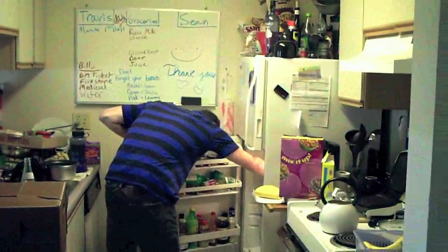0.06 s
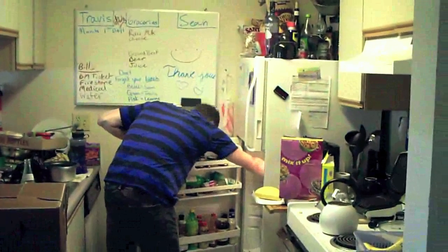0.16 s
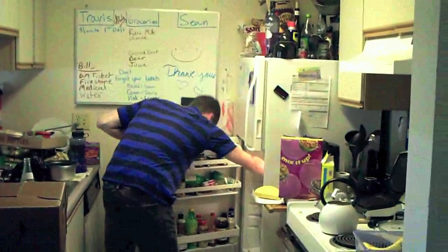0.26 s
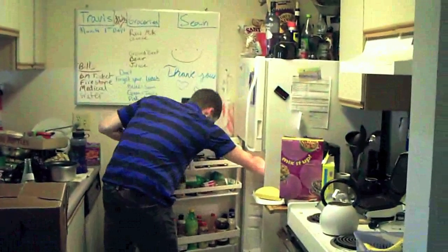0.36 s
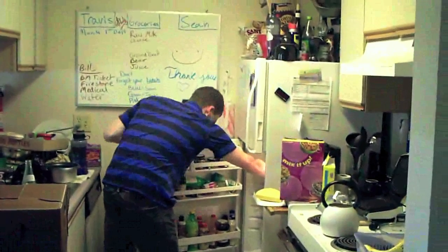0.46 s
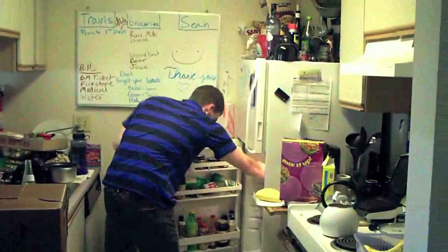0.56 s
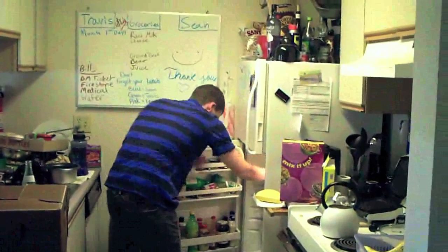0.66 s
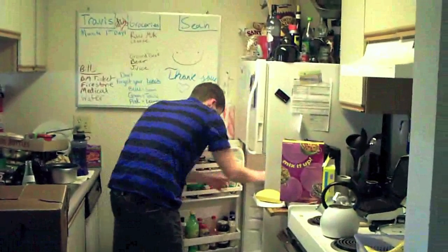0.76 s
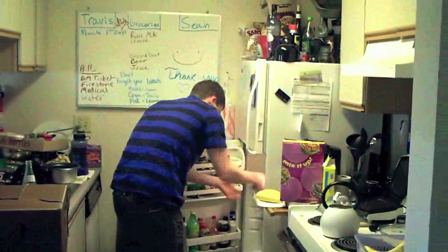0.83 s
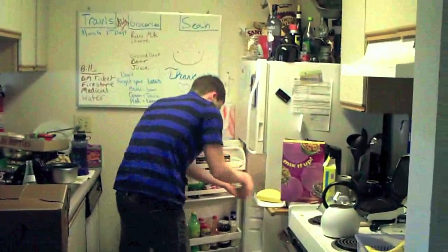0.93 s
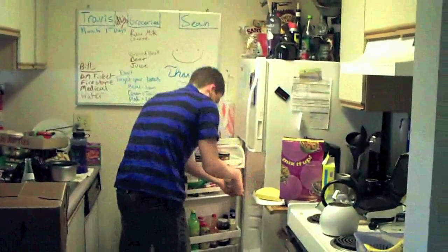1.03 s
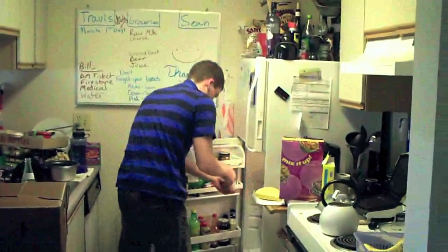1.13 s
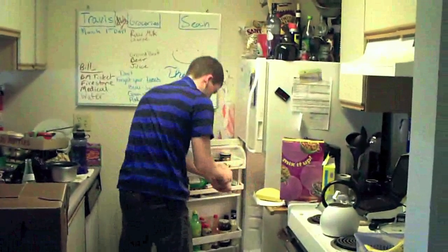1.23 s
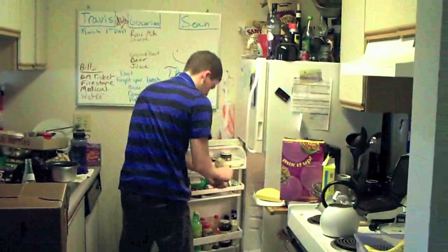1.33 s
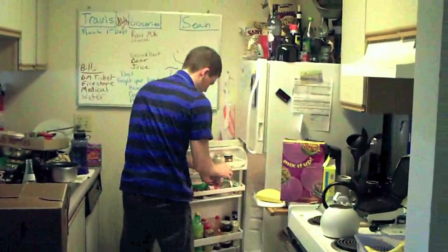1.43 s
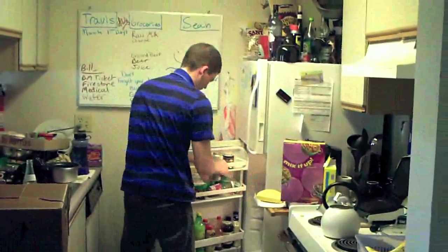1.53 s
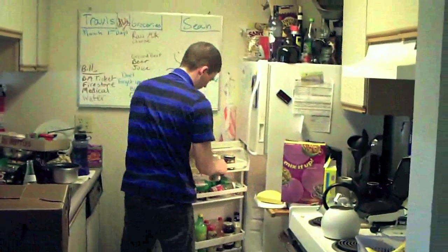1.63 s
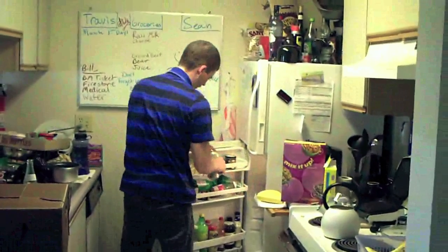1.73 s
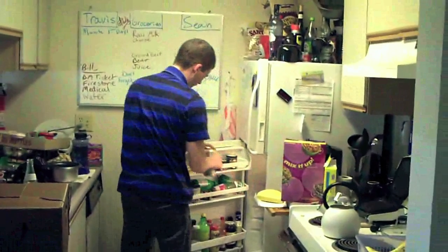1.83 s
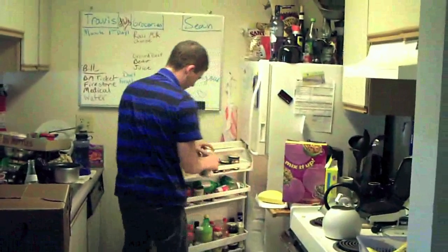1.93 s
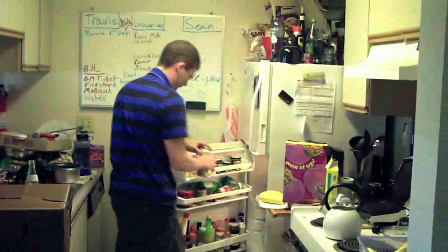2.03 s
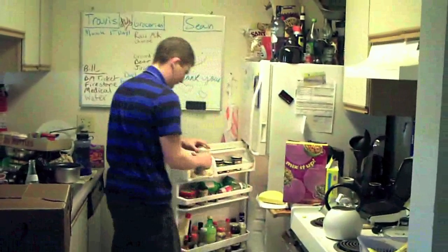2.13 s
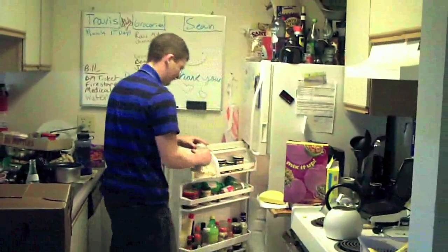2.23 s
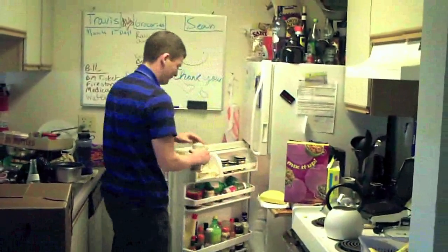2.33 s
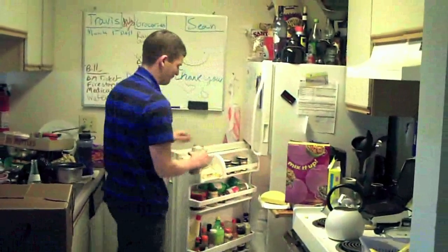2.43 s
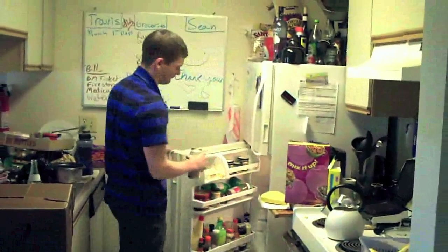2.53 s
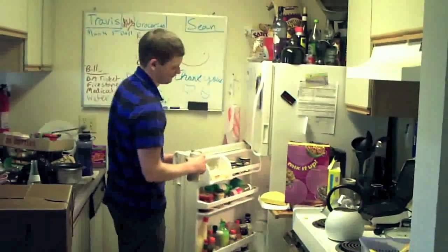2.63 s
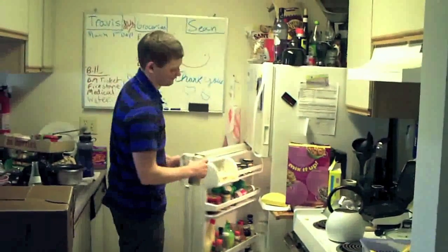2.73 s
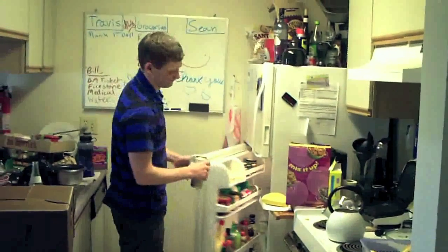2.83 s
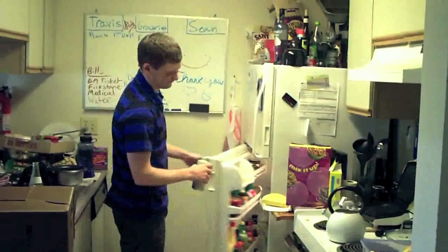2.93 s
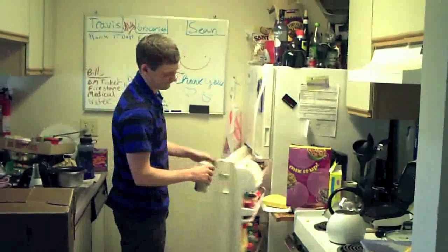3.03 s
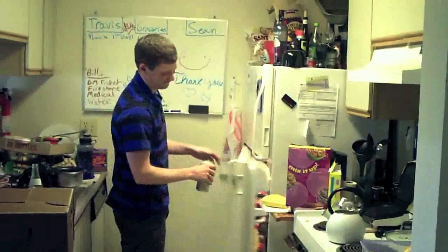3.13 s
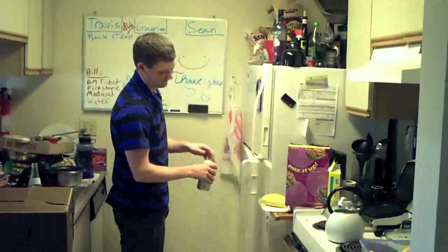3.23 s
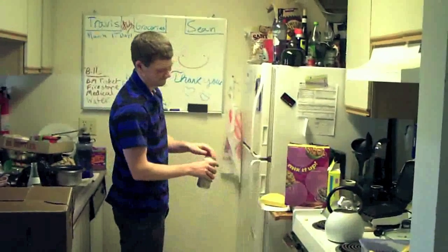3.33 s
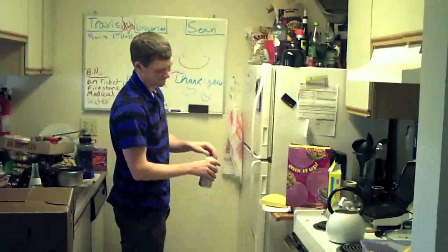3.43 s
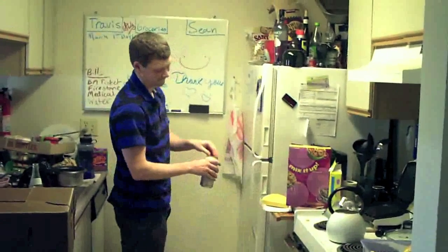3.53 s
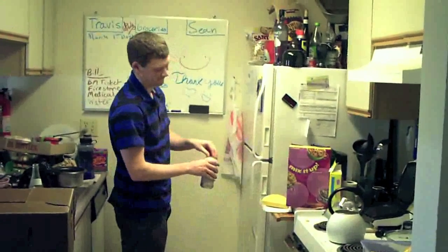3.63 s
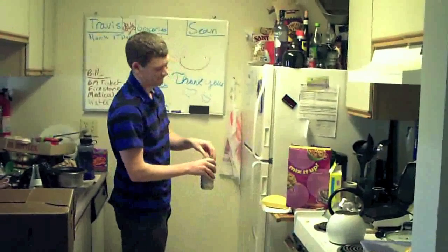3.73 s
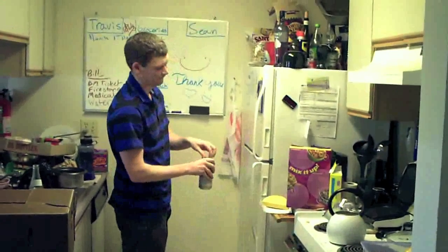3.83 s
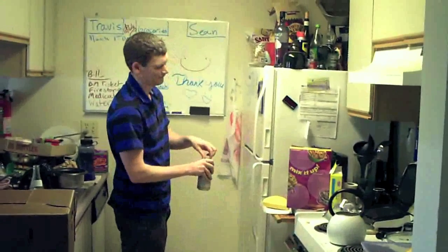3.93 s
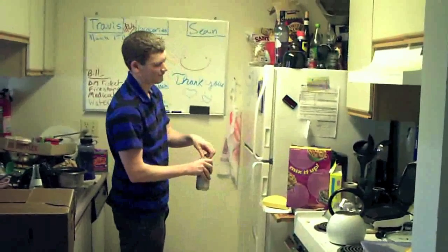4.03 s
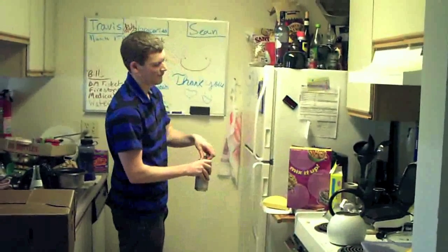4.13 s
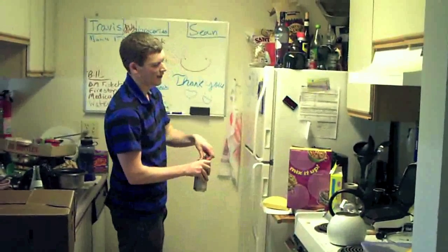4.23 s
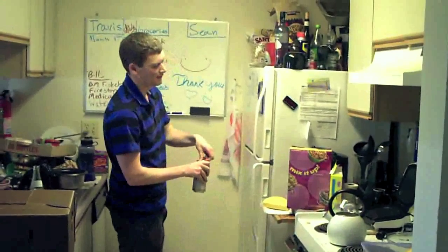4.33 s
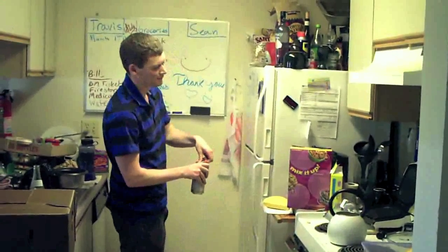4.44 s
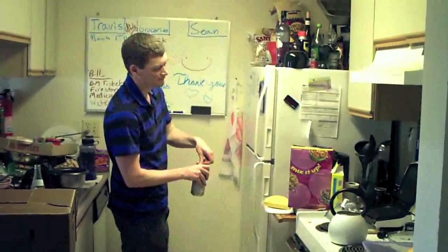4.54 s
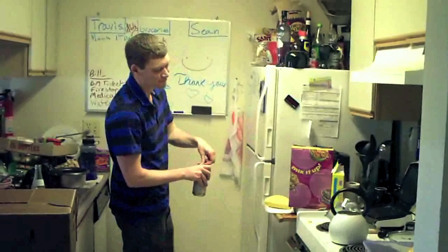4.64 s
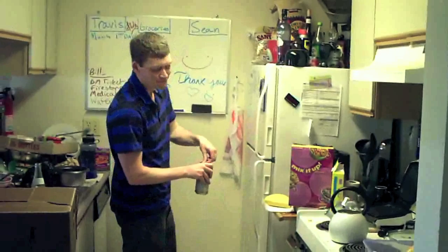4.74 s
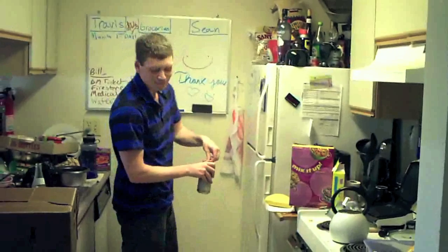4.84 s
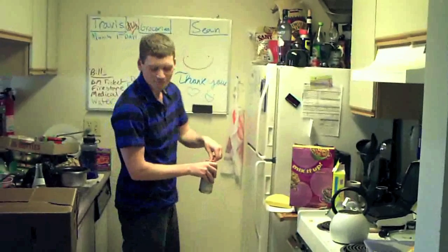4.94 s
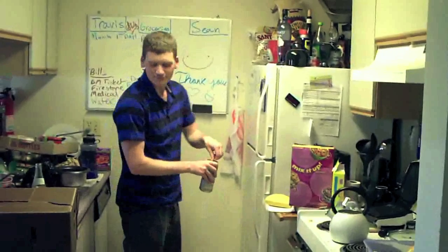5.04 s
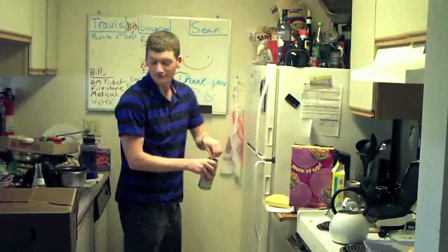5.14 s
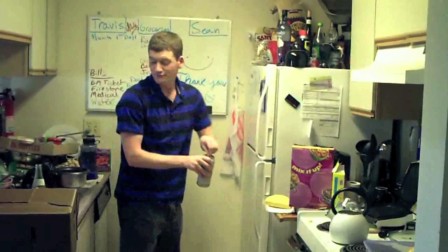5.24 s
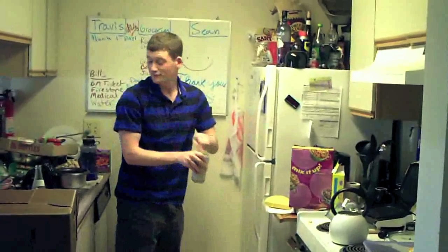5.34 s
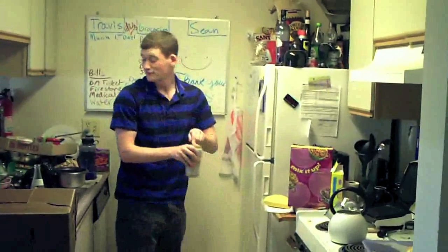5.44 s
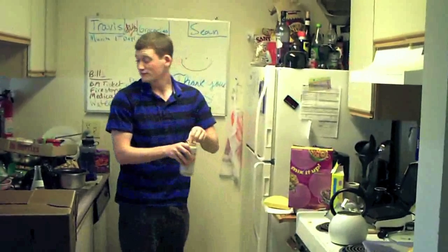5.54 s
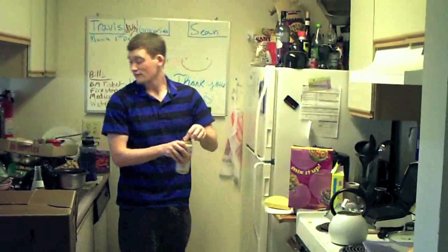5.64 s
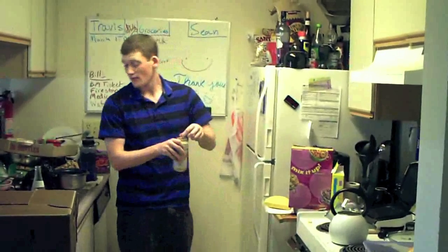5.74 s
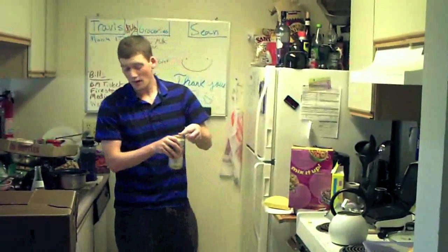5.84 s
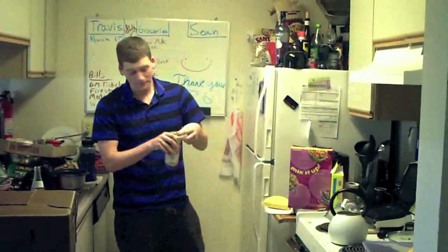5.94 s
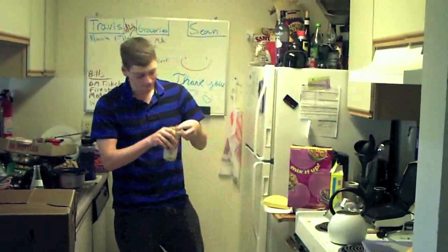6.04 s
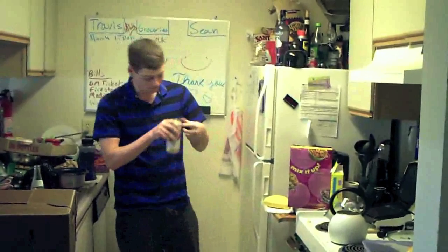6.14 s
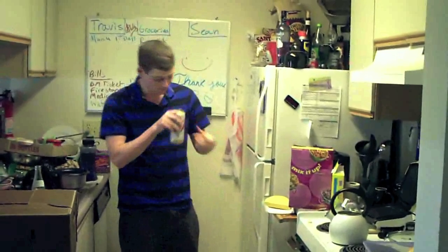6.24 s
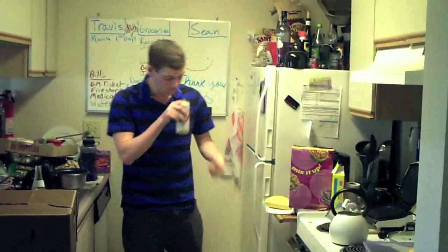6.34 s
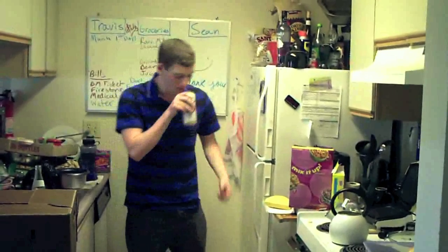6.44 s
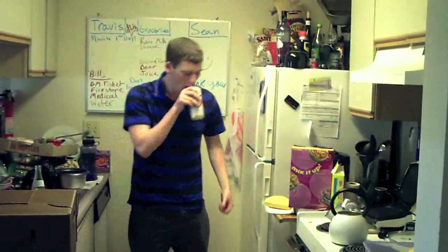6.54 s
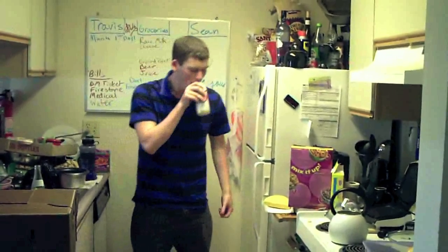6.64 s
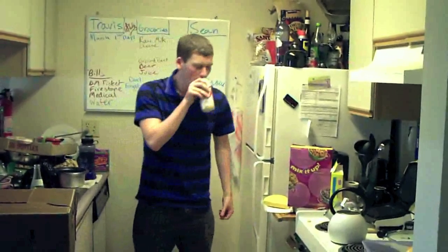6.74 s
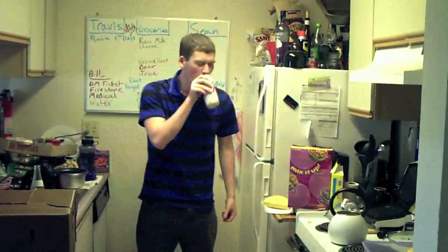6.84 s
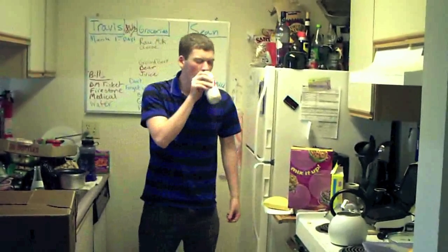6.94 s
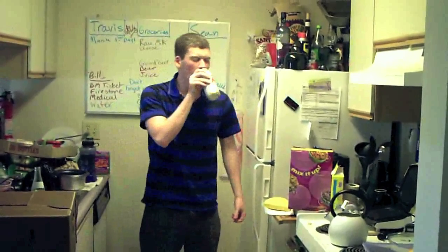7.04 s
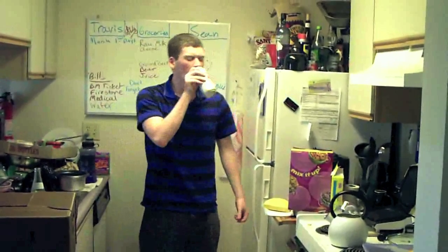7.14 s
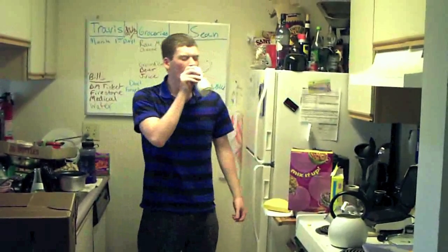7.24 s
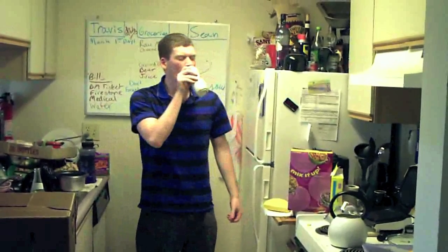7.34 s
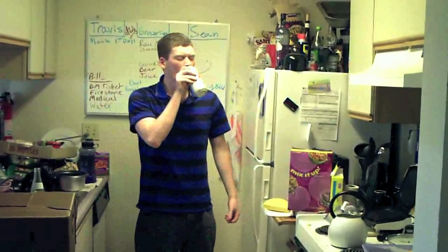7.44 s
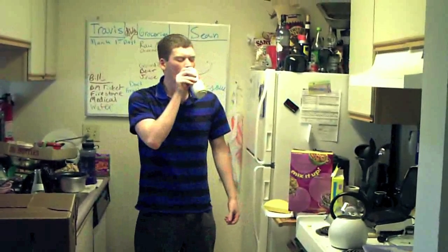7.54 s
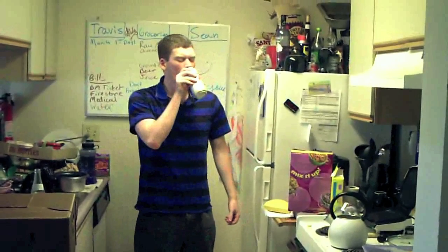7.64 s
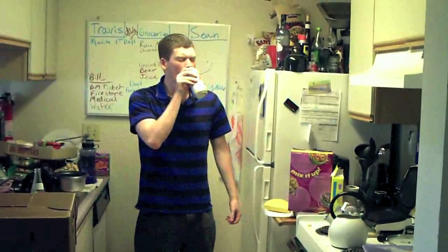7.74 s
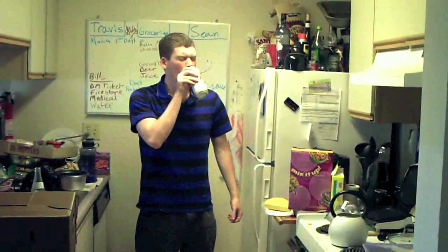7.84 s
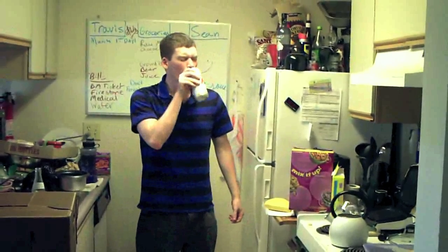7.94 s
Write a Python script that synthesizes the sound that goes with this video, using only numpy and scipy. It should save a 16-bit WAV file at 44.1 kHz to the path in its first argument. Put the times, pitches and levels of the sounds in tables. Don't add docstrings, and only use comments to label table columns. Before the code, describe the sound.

Close, small kitchen with a faint refrigerator hum and thin whine. Full jars and cans knock dully, then tick and rap sharply as one is taken. The door thumps shut with a rattle. A can tab snaps and chatters, gas hisses, and the lid cracks loudly, overloading a narrow, ringing microphone. A few light raps follow.

```python
import sys
import numpy as np
from scipy import signal
from scipy.fft import rfft, irfft
from scipy.io import wavfile
from scipy.ndimage import uniform_filter1d

SR = 44100
rng = np.random.default_rng(int(sys.argv[2]) if len(sys.argv) > 2 else 0)


def decibels_to_gain(level_db):
    exponent = np.asarray(level_db, float) / 20
    return 10 ** exponent


def to_wav(sig):
    pcm = np.clip(np.atleast_2d(sig), -1, 1) * 32767
    pcm = np.round(pcm).astype(np.int16)
    wavfile.write(sys.argv[1], SR, pcm.T)


N = 351918
T = np.arange(N) / SR
MIC_LIFT_DB = 11.5

# f/Hz, width/Hz
BANDS = [(270, 244), (850, 750), (2100, 1140), (5000, 3820)]


def unit(x):
    return x / np.sqrt(np.mean(x ** 2))


def band(x, hz, width):
    low = np.sqrt(hz ** 2 + width ** 2 / 4) - width / 2
    sos = signal.butter(2, [low, low + width], "bandpass", fs=SR, output="sos")
    return signal.sosfilt(sos, x)


def noise(hz, width):
    return unit(band(rng.standard_normal(N), hz, width))


def colour(x, table, size=4096):
    hz, db = np.transpose(table)
    bins_hz = np.fft.rfftfreq(size, 1 / SR) + 1
    cepstrum = irfft(np.log(decibels_to_gain(np.interp(np.log(bins_hz), np.log(hz), db))))
    cepstrum[1:size // 2] *= 2
    cepstrum[size // 2 + 1:] = 0
    return signal.fftconvolve(x, irfft(np.exp(rfft(cepstrum))))[:N]


def walk(rate):
    hold = max(int(SR / rate), 33)
    steps = rng.standard_normal(N // 32)[:N // hold + 1]
    return uniform_filter1d(uniform_filter1d(np.repeat(steps, hold), hold), hold)[:N]


def curves(table, silent=None):
    s, *columns = np.transpose(table)
    return [np.interp(T, s, column, silent, silent) for column in columns]


def decay(s, t60, rise_s):
    i = int(s * SR)
    t = T[:min(int(t60 * SR), N - i)]
    return i, t, (1 - np.exp(-t / rise_s)) * decibels_to_gain(-60 * t / t60)


def swells(table, size=64):
    t = T[::size]
    total = 0
    for s, db, rise_s, fade_s in table:
        total = total + decibels_to_gain(db) * np.exp(np.where(t < s, (t - s) / rise_s, (s - t) / fade_s))
    return np.interp(T, t, total)


def impacts(table, bands, grain_db, rise_s, first_db, clank_db, hard):
    push, first = np.zeros((2, 4, N))
    for s, tick_db, body_db, thud_db, t60 in table:
        between_db = hard * tick_db + (1 - hard) * body_db + clank_db
        levels = (thud_db + 3.5, body_db + 5.0, between_db, tick_db - MIC_LIFT_DB)
        for k, db in enumerate(levels):
            slow = (bands[3][0] / bands[k][0]) ** 0.41
            i, t, env = decay(s, max(t60, .005) * slow, rise_s * slow ** 2.0)
            push[k, i:i + len(t)] += decibels_to_gain(db) * env
            first[k, i] += decibels_to_gain(db + first_db)
    contacts = rng.standard_normal(N) * decibels_to_gain(grain_db * walk(700))
    out = np.zeros(N)
    for k, (hz, width) in enumerate(bands):
        out += band(contacts * push[k] + first[k], hz, width) * np.sqrt(SR / 2 / width)
    return out


def modes(table, rise_s, shake_s):
    out, shake = np.zeros(N), shake_s * walk(350)
    for s, hz, db, t60, *sign in table:
        i, t, env = decay(s, t60, rise_s)
        swing = np.sin(2 * np.pi * hz * (t + shake[i:i + len(t)]))
        out[i:i + len(t)] += (sign[0] if sign else 1) * decibels_to_gain(db) * env * swing
    return out


def jars_and_cans():
    # t/s, tick peak level/dB, body level/dB, thud level/dB, rattle t60/s
    full_knocks = [(0.0044, -34, -38.5, -30.5, 0.025), (0.2234, -45, -40.5, -37.5, 0.084),
                   (0.262, -33, -32.5, -29.5, 0.068), (0.2989, -34, -20, -39, 0.037),
                   (0.319, -30, -45, -22, 0.026), (0.3395, -37, -50, -30, 0.04),
                   (1.016, -39.5, -49, -57, 0.051), (2.0952, -34, -39, -40.5, 0.057),
                   (2.2979, -35, -44, -41.5, 0.044), (2.375, -39, -52, -42.5, .12),
                   (2.6476, -34, -30, -28.5, 0.048), (3.1316, -36, -40.5, -39, 0.034),
                   (5.4814, -36.5, -42.5, -40.5, 0.073)]
    # t/s, tick peak level/dB, rattle t60/s
    light_ticks = [(0.1533, -34.5, 0.052), (0.4204, -40, 0.1), (0.468, -39, 0.093), (0.7656, -42.5, .069),
                   (1.7283, -34.5, 0.095), (1.7961, -19, 0.068), (2.1163, -32, .074), (2.138, -21.5, 0.043),
                   (2.2425, -35.5, 0.046), (5.0253, -24.5, 0.046), (5.519, -39, 0.08), (5.835, -25, 0.089),
                   (5.8994, -40, 0.08), (5.9694, -45, 0.19), (6.527, -41, 0.12), (7.3703, -43, .027)]
    body_db = -24
    ticks = [(s, db, db + body_db, db + body_db, t60) for s, db, t60 in light_ticks]
    return impacts(ticks + full_knocks, BANDS, grain_db=3.0, rise_s=0.0028, first_db=13.0,
                   clank_db=-10.0, hard=0.87)


def hard_raps():
    # t/s, tick peak level/dB, body level/dB, thud level/dB, rattle t60/s
    hard_blows = [
        (1.9926, -20, -27, -34, 0.028),
        (2.428, -27, -35.5, -35.5, 0.038),
        (3.6358, -25.5, -41.5, -36.5, 0.079),
        (6.1833, -22.5, -32, -34.5, 0.062),
        (6.2548, -27, -29.5, -39.5, 0.032),
        (7.0618, -26, -35.5, -36, 0.067),
    ]
    return impacts(hard_blows, BANDS, grain_db=3.0, rise_s=0.00081, first_db=10.5, clank_db=-5.5, hard=0.39)


def door():
    # t/s, tick peak level/dB, body level/dB, thud level/dB, rattle t60/s
    closing = [
        (3.3197, -47, -53, -37.5, 0.13),
        (3.3544, -33, -22, -23.5, 0.05),
        (3.3608, -11, -29.5, -30, .076),
        (3.4086, -26, -24, -35, 0.048),
        (3.4476, -41, -33.5, -31, 0.097),
        (3.5186, -38, -41.5, -37, 0.097),
    ]
    # f/Hz, width/Hz
    padded_bands = [(250, 270), (900, 950), (1900, 680), (4500, 2800)]
    return impacts(closing, padded_bands, grain_db=0.5, rise_s=0.0035, first_db=7.0, clank_db=-17, hard=.4)


def tab(count=12):
    # t/s, tick peak level/dB, body level/dB, rattle t60/s
    tab_blows = [
        (4.2707, -40.5, -62, .17),
        (4.2956, -27, -54.5, 0.12),
        (4.4241, -4, -34.5, .04),
        (4.5088, -1, -31, .012),
        (4.7265, -28, -44.5, .048),
        (4.7703, -21, -41.5, .039),
        (4.996, -37, -57, 0.053),
        (5.034, -21, -40, 0.027),
        (5.1083, 3, -18.5, 0.044),
    ]
    # f/Hz, width/Hz
    can_bands = [(350, 730), (1300, 550), (2700, 2240), (5000, 3300)]
    thud_db = -6.5
    snap_s, snap_db, snap_body_db, snap_t60_s = 4.5085, -0.5, -30.5, .011
    bounce_s, bounce_loss_db = .0047, 1.64
    scatter = .2 * rng.standard_normal(count) * (np.arange(count) > 0)
    chatter = []
    for k in np.arange(count) + scatter:
        loss_db = k * bounce_loss_db
        chatter.append((snap_s + k * bounce_s, snap_db - loss_db, snap_body_db - loss_db, snap_t60_s))
    rows = [(s, tick_db, body_db, body_db + thud_db, t60) for s, tick_db, body_db, t60 in tab_blows + chatter]
    return impacts(rows, can_bands, grain_db=4.5, rise_s=0.000065, first_db=10.0, clank_db=4.0, hard=0.29)


def tear():
    # t/s, tick level/dB, body level/dB
    rip = [
        (5.1086, -30.5, -50),
        (5.1093, -0.5, -23.5),
        (5.118, -5, -14),
        (5.131, -7.5, -20.5),
        (5.14, -19.5, -25.5),
        (5.17, -21.5, -35),
    ]
    tick_db, body_db = curves(rip, silent=-120)
    return decibels_to_gain(tick_db - MIC_LIFT_DB) * noise(4600, 2200) + decibels_to_gain(body_db) * noise(1400, 1300)


def gas():
    # t/s, jet level/dB, whistle share level/dB
    spurts = [
        [(4.44, -26, -15), (4.47, -29, -15), (4.5, -30, -1), (4.575, -36, -14.5), (4.641, -34, -9.5),
         (4.789, -30.5, -6.5), (4.86, -35.5, -9.5), (4.93, -41, -14), (4.99, -65, -11)],
        [(4.995, -56, -15), (5.02, -50, -5), (5.04, -26, -17), (5.062, -39, -11), (5.07, -23, -11),
         (5.105, -23.5, -17)],
    ]
    # f/Hz, width/Hz, level/dB
    edge_tones = [(4920, 300, -4), (6050, 730, -1.5)]
    low_db = -11.5
    jet_db, whistle_db = curves(np.vstack(spurts), silent=-120)
    whistle = sum(decibels_to_gain(db) * noise(hz, width) for hz, width, db in edge_tones)
    jet = decibels_to_gain(-MIC_LIFT_DB) * noise(*BANDS[3]) + decibels_to_gain(low_db) * noise(1500, 2500) + decibels_to_gain(whistle_db) * whistle
    flutter_db = 2.2 * walk(60) + 3.0 * walk(400)
    return decibels_to_gain(jet_db - 4.5 + flutter_db) * jet


def ringing():
    # t/s, f/Hz, peak level/dB, t60/s
    struck_modes = [(0.3, 290, -31, 0.21), (0.31, 237, -37, 0.14), (1.45, 306.3, -34, 0.19),
                    (1.475, 300, -31.5, 0.13), (1.797, 4780, -48, 0.17), (1.805, 4100, -46.5, 0.15),
                    (1.995, 1640, -30.5, 0.074), (2.425, 1710, -28, 0.049), (2.648, 586, -28.5, 0.076),
                    (3.37, 1126, -25.5, 0.21), (3.405, 1037, -27, 0.11), (5.035, 3260, -31.5, 0.25),
                    (5.115, 1457, -27, 0.19), (6.142, 1798, -44, 0.28)]
    return modes(struck_modes, rise_s=0.0017, shake_s=.00013)


def scuffs():
    # t/s, f/Hz, width/Hz, level/dB, t60/s
    rubs = [
        (1.451, 3030, 250, -44, .2),
        (1.479, 2950, 300, -42.5, .16),
        (1.456, 1900, 1600, -44, .3),
        (1.581, 2700, 250, -50.5, .18),
        (2.753, 3250, 250, -45.5, .12),
        (5.036, 2900, 2000, -33, .12),
        (5.111, 1350, 500, -21.5, .13),
        (6.255, 1950, 700, -29.5, .09),
        (7.063, 1700, 1000, -35.5, .12),
        (7.131, 2100, 500, -43.5, .28),
    ]
    out, rub = np.zeros(N), rng.standard_normal(N)
    for s, hz, width, db, t60 in rubs:
        i, t, env = decay(s, t60, 0.0035)
        rubbed = band(rub[i:i + len(t)], hz, width) * np.sqrt(SR / 2 / width)
        out[i:i + len(t)] += decibels_to_gain(db) * env * rubbed
    return out


def thumps():
    # t/s, f/Hz, peak level/dB, t60/s, first swing (+ up, - down)
    pushes = [(0.36, 16.6, -33, 1.5, 0.92), (2.005, 35, -13.5, 0.13, 0.64), (1.0, 19, -41, 0.75, 1),
              (2.7, 17.6, -32.5, 1.1, 1), (3.8, 18, -29.5, 0.88, 0.86), (4.47, 18, -29, 1.34, 0.79),
              (5.08, 21, -30.5, 0.33, 0.98), (2.008, 110, -27, 0.11, -1), (2.435, 26.5, -17, 0.52, -0.65),
              (2.44, 85, -32, .1, -1.2), (3.35, 43, -13.5, 0.073, -1.6), (3.362, 20, -4.5, 0.51, 0.66),
              (3.364, 51, -17, 0.27, 0.87), (3.37, 80, -29, .2, 0.75), (3.5, 62, -32, .4, 1),
              (3.63, 31, -25, 0.42, 1), (5.645, 16.6, -32, 0.87, 1), (6.185, 97, -33, 0.24, 1),
              (6.26, 33, -28.5, 0.25, 1), (6.79, 19, -29.5, 0.9, -0.98), (7.07, 48, -27.5, 0.26, 0.98),
              (7.08, 98, -30, 0.11, 1), (7.37, 12, -29, 0.78, 0.76)]
    return modes(pushes, rise_s=.006, shake_s=0)


def room(x):
    _, t, env = decay(0, 0.29, 0.0036)
    tail = env * rng.standard_normal(N)[:len(t)]
    return x + decibels_to_gain(-6) * signal.fftconvolve(x, tail / np.sqrt(np.sum(tail ** 2)))[:N]


def line(hz):
    waver = decibels_to_gain(2.2 * walk(20))
    return waver * np.sqrt(2) * np.sin(2 * np.pi * (hz * T + .15 * walk(13)))


def compressor(open_db):
    # f/Hz, width/Hz, level/dB
    panel_bands = [(58.3, 10, -57.5), (206.2, 26, -57.5), (300, 32, -57.5), (833, 30, -58),
                   (1206, 20, -66.5)]
    # f/Hz, level/dB
    upper_lines = [(3833, -5), (4511, -19.5), (4748, -10.5), (6282, -11.5)]
    # peak t/s, gain level/dB, rise/s, fade/s
    flares = [
        (.34, -11, .03, 0.025),
        (.56, -13, 0.02, 0.035),
        (.94, 0, 0.018, .03),
        (1.36, -5, 0.034, 0.046),
        (1.6, -2.5, .05, .03),
        (2.84, -5, .03, 0.027),
        (3.14, -2, .05, .04),
        (4.38, -2, .03, .02),
        (6.07, 1.5, .05, 0.022),
    ]
    # peak t/s, level/dB, rise/s, fade/s
    drones = [
        (.95, -54.5, 0.23, 0.056),
        (1.4, -52.5, .1, 0.38),
        (2.45, -50, 0.046, 0.064),
        (5.12, -46, 0.023, 0.051),
        (7.75, -52.5, 0.43, 0.21),
    ]
    turn_s, turn_db = 1.5, -5.5
    panels = sum(decibels_to_gain(db + 3.3 * walk(6)) * noise(hz, width) for hz, width, db in panel_bands)
    upper_gain = decibels_to_gain(-63.5 + 1.3 * open_db + turn_db * (T > turn_s))
    upper = upper_gain * sum(decibels_to_gain(db) * line(hz) for hz, db in upper_lines)
    whine = decibels_to_gain(-54 + open_db) * line(2330)
    throb = decibels_to_gain(4.5 * walk(24)) * (0.6 + swells(flares))
    drone = (decibels_to_gain(-60) + swells(drones)) * noise(110, 18)
    return panels + drone + throb * (whine + upper)


def kitchen(open_db):
    # f/Hz, level/dB per Hz
    air_spectrum = [(45, -2.5), (60, -3.5), (75, -8.5), (120, -10.5), (160, -6.5), (250, -2.5), (500, -10),
                    (800, -5.5), (1200, -10), (2000, -15), (3000, -24.5), (4500, -40.5), (7000, -53)]
    # peak t/s, level/dB, rise/s, fade/s
    stirs = [
        (.36, -55, .15, .08),
        (2.0, -55.5, .1, 0.37),
        (3.49, -46, .03, .06),
        (3.85, -60.5, .2, 0.12),
        (4.34, -48.5, .03, 0.046),
        (4.55, -25, .03, .03),
        (4.73, -35, .05, .09),
        (5.18, -42, .02, 0.14),
        (5.82, -48.5, .04, 0.14),
        (6.3, -51.5, .2, 0.21),
    ]
    air = unit(colour(rng.standard_normal(N), air_spectrum)) * decibels_to_gain(-46 + .3 * open_db + 0.72 * walk(5))
    rustle_size = decibels_to_gain(-55.5 + .9 * open_db) + swells(stirs)
    rustle = noise(*BANDS[3]) * decibels_to_gain(3.0 * walk(60) - MIC_LIFT_DB) * rustle_size
    rumble = decibels_to_gain(-54.5 + 2.7 * walk(3)) * noise(21, 18)
    return rumble + air + rustle


def scene():
    # t/s, level/dB
    openness = [(0, -1.5), (.5, 0), (.85, -2.5), (1.0, -0.5), (1.6, 1), (1.75, -1.5), (2.7, 2),
                (2.95, -5.5), (3.15, -1.5), (3.3, -9), (3.5, -1), (4.4, -4), (5.3, -6.5), (6.1, -11),
                (6.45, -12), (7.5, -8), (7.75, -10.5), (7.98, -10)]
    blows = jars_and_cans() + hard_raps() + door() + tab()
    blows = blows + ringing() + tear() + scuffs()
    open_db, = curves(openness)
    return (room(blows) + gas() + thumps() + kitchen(open_db) + compressor(open_db))[None]


def low_pass(x):
    return signal.sosfilt(signal.butter(12, 16660, fs=SR, output="sos"), x)


def record(dry):
    # f/Hz, gain level/dB
    mic_response = [(10, 1), (2500, -1.5), (3300, 0), (4000, 7.5), (4600, 15.5), (5100, 6), (5600, -4.5),
                    (6200, -2.5), (6600, -11.5), (7000, -31.5), (7600, -72.5), (22050, -82.5)]
    clip = .7
    heard = np.clip(colour(dry[0], mic_response), -clip, clip)
    return low_pass(heard[None])


dry = scene()
out = record(dry)
to_wav(out)
```